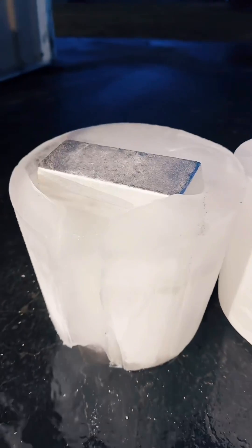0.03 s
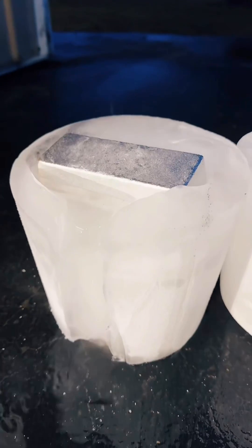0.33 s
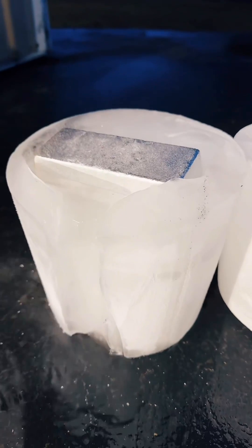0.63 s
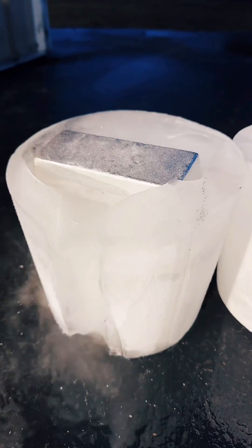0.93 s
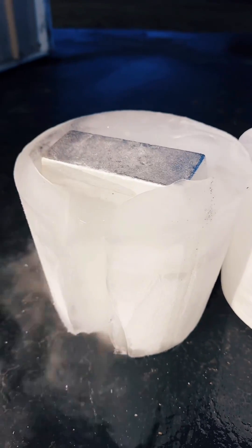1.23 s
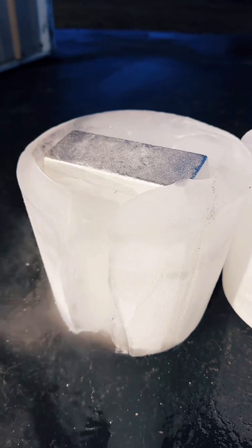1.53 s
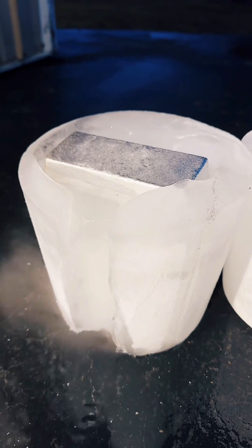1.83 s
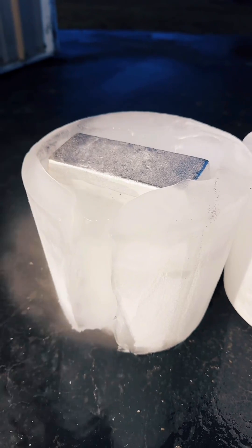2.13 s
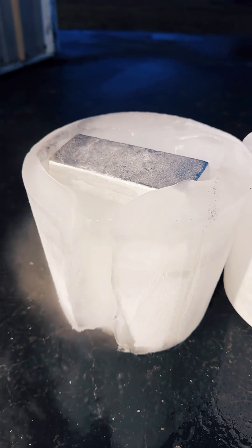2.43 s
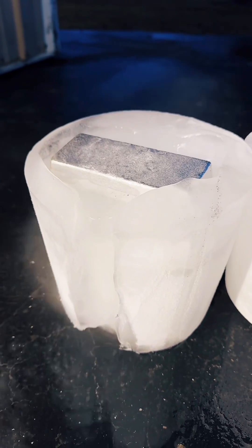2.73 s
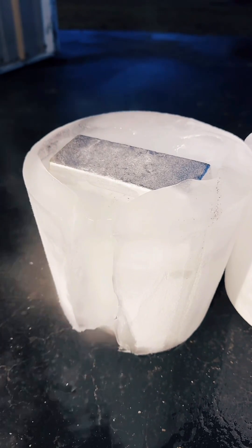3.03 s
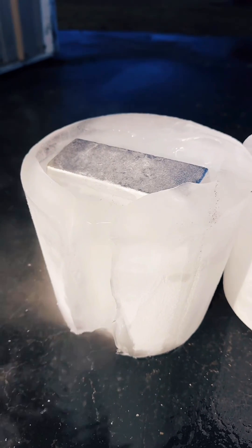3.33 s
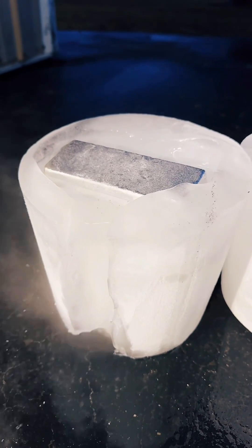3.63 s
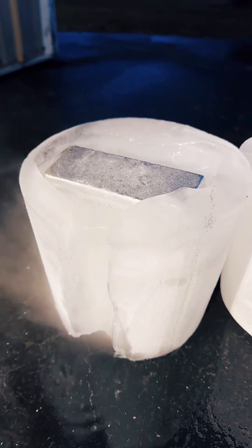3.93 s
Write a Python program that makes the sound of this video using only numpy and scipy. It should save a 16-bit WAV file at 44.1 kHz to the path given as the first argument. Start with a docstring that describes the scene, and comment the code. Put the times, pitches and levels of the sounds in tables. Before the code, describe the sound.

Close sizzling of hot metal melting into ice starts with a sharp hiss and a breathy whistle. Meltwater simmers and steam squirts slide downward in pitch, until large bubbles glug near the end, over a low air rumble.

```python
"""A hot metal bar melts its way into a block of ice on a wet surface, heard close up in mono.
It opens on a bright jet of steam and a breathy whistle from a crack, over simmering meltwater and
low air rumble. Within two seconds the jet dies down, leaving a fine sizzle with spurts of fizz.
The steam pocket under the bar rings lower and lower as it grows, and squirts whistle downwards.
Near the end big bubbles gulp out, the hollow under the block booms and a new jet opens."""
import sys
import numpy as np
from scipy import signal
from scipy.fft import rfft, irfft
from scipy.io import wavfile

SR = 44100
rng = np.random.default_rng(int(sys.argv[2]) if len(sys.argv) > 2 else 0)


def wav_record(signal):
    """Record a signal, one row per channel, as 16-bit PCM in the file named by sys.argv[1]."""
    frames = np.transpose(np.atleast_2d(signal))
    bounded = np.clip(frames, -1, 1)
    # unit amplitude maps onto the largest positive 16-bit level
    quanta = np.round(bounded * 32767).astype(np.int16)
    wavfile.write(sys.argv[1], SR, quanta)


N = 176400  # 4 s


# EQ of the opening jet: (frequency [Hz], gain [dB])
JET_EQ = [(100, -62), (1100, -28), (2000, -25), (2650, -21.5), (2950, -8), (3250, -8.5), (3500, -9),
          (3850, -10), (4450, -10.5), (4850, -15), (5150, -3), (5450, 1.5), (5850, -3.5), (6050, -6),
          (6350, -4.5), (7200, -10.5), (7800, -9.5), (8300, -15), (8750, -24), (9400, -11.5), (10800, -20),
          (11500, -14.5), (12200, -20.5), (13600, -22), (14400, -26), (16000, -25)]
# its fade-out: (time [s], level [dB])
JET_FADER = [(0, -25.5), (.19, -25), (.42, -28.5), (.6, -30.5), (.97, -28.5), (1.12, -34.5), (1.22, -33.5),
             (1.5, -42), (1.7, -42), (4, -77)]

def jet():
    """Steam rushes out from under the hot bar in a bright hiss that dies away."""
    hiss = patchy(bursts(6000, spread_db=2.3, wash=0.97), depth_db=1.5, span_hz=400, span_s=0.055)
    return colour(hiss, JET_EQ) * amp(curve(JET_FADER))


# EQ of the sizzle, peaking at the resonances of the gap under the bar: (frequency [Hz], gain [dB])
SIZZLE_EQ = [(100, -28), (700, -9.5), (1000, -14), (1400, -6), (2300, 0), (2800, -8), (3250, 0.5),
             (3550, 1.5), (3900, 5), (4200, 0), (4450, 1), (4750, -1.5), (5100, 0), (5450, 2.5),
             (5900, -0.5), (6100, -1.5), (6600, -3.5), (7100, -12), (7650, -4.5), (7900, -12), (8250, -2.5),
             (8600, -10), (9100, -14.5), (9700, -13.5), (10600, -13), (11200, -14.5), (12200, -17),
             (12700, -17), (16000, -24)]
# its nearly even level: (time [s], level [dB])
SIZZLE_FADER = [(0, -35), (.55, -34.5), (.8, -32.5), (1, -34), (1.15, -33), (1.55, -31.5), (1.67, -35.5),
                (1.9, -33), (2.1, -34), (2.25, -33.5), (2.4, -32.5), (2.8, -34.5), (2.93, -32),
                (3.05, -35.5), (3.45, -34.5), (3.68, -40.5), (4, -31)]

def sizzle():
    """The water film boils in patches against the metal."""
    film = patchy(bursts(5000, spread_db=3.3, wash=0.69), depth_db=2.0, span_hz=597, span_s=0.06)
    return colour(film, SIZZLE_EQ) * amp(curve(SIZZLE_FADER))


# airy EQ of the spray: (frequency [Hz], gain [dB])
FIZZ_EQ = [(100, -24), (2000, -10.5), (5500, -0.5), (7100, -1.5), (8100, 1.5), (9000, -7), (9800, -2),
           (12100, -4.5), (12800, -7), (16000, -10)]
# its spurts: (time [s], level [dB])
FIZZ_FADER = [(0, -30.5), (.8, -40.5), (.87, -47), (.93, -51), (1.05, -29.5), (1.16, -52), (1.45, -40.5),
              (1.58, -39), (1.67, -46), (1.75, -38.5), (2.03, -39.5), (2.08, -34.5), (2.14, -42),
              (2.65, -37.5), (2.84, -42), (2.88, -36), (2.98, -40), (3.02, -46), (3.1, -36.5), (3.27, -43),
              (3.6, -39), (4, -42)]

def fizz():
    """Fine spray spits out in fluttering spurts."""
    spray = colour(bursts(6000, spread_db=1.9, wash=0.98), FIZZ_EQ)
    return spray * amp(curve(FIZZ_FADER) + 1.5 * wander(25))


# sweep of the second jet: (time [s], resonance [Hz], level [dB])
NEW_JET_SWEEP = [(3.66, 8300, -73), (3.74, 8050, -38.5), (3.8, 7600, -36), (3.87, 7650, -42),
                 (3.93, 6440, -35), (3.98, 6030, -37), (4, 6000, -35)]

def new_jet():
    """A fresh steam jet opens at the end, a wide band of hiss sweeping down."""
    hiss = resonate(rng.standard_normal(N), curve(NEW_JET_SWEEP), width_hz=2000)
    return hiss * amp(curve(NEW_JET_SWEEP, axis=2))


def steam():
    """Jets, sizzle and spray reflect inside the hollow of the ice and sputter together."""
    bus = jet() + sizzle() + fizz() + new_jet()
    ring_s, wet = 0.0076, 0.35
    t = np.arange(2048) / SR
    tail = rng.standard_normal(len(t)) * np.exp(-t / ring_s)
    reflections = signal.fftconvolve(bus, tail / np.linalg.norm(tail))[:N]
    return (bus + wet * reflections) * amp(0.6 * wander(20))


# sweep of the steam pocket: (time [s], lower resonance [Hz], level [dB])
POCKET_SWEEP = [(0, 2330, -63), (1.1, 2280, -45), (1.38, 2130, -38.5), (1.52, 2000, -41), (1.63, 1930, -38),
                (1.71, 1930, -38), (2.0, 1920, -36), (2.3, 2010, -40), (2.62, 1930, -40),
                (2.72, 1840, -34.5), (2.95, 1930, -33), (3.2, 1760, -31.5), (3.32, 1760, -33.5),
                (3.45, 1510, -35), (3.58, 1450, -35), (3.62, 1690, -40.5), (3.68, 1800, -34),
                (3.8, 1720, -42.5), (3.93, 2000, -37), (4, 1850, -40)]

def pocket():
    """Steam rings two resonances of the pocket under the bar, which sink as it grows."""
    hz = curve(POCKET_SWEEP) + 35 * wander(13)
    lower = resonate(bursts(2500, spread_db=3.2, wash=0.68), hz, width_hz=580)
    upper = resonate(bursts(2300, spread_db=4.2, wash=0.63), hz * 1.32, width_hz=710)
    low_cut = signal.butter(4, 1100, "high", fs=SR, output="sos")
    ring = signal.sosfilt(low_cut, lower + amp(-6) * upper)
    return ring * amp(curve(POCKET_SWEEP, axis=2) + 0.79 * wander(50))


# steam squirts: (time [s], length [s], start pitch [Hz], end pitch [Hz], level [dB])
SQUIRT_CUES = [(1.384, 0.13, 2230, 1990, -39), (1.57, 0.12, 1980, 1810, -33),
               (3.126, 0.16, 1880, 1370, -34.5), (3.269, 0.12, 2120, 1510, -33),
               (3.629, 0.05, 2050, 1910, -36.5)]

def squirts():
    """Short squirts of steam swell and fade as they whistle downwards."""
    out = np.zeros(N)
    for s, length, start_hz, end_hz, db in SQUIRT_CUES:
        glide = np.linspace(start_hz, end_hz, round(length * SR))
        squirt = resonate(rng.standard_normal(N)[:len(glide)], glide, width_hz=280)
        add(out, s, amp(db) * np.hanning(len(glide)) * squirt)
    return out


# main whistle of the crack: (time [s], level [dB])
WHISTLE_FADER = [(0, -33.5), (.45, -42), (.95, -34), (1.12, -46.5), (1.7, -44), (1.94, -34.5), (2.22, -47),
                 (2.35, -38), (2.6, -45), (2.68, -32), (3.02, -41.5), (3.7, -36.5), (4, -45)]
# upper whistle, swelling as the crack widens: (time [s], level [dB])
UPPER_FADER = [(0, -55), (2.6, -57), (3.2, -48), (3.4, -44), (4, -43)]
# thin hiss on top: (time [s], level [dB])
TOP_FADER = [(0, -60), (1.6, -53), (2.0, -49.5), (2.5, -47.5), (2.65, -43), (2.8, -50.5), (3.4, -46.5),
             (4, -45.5)]

def whistles():
    """Steam whistles breathily through a narrow crack, at three pitches."""
    sag_hz_per_s = 24
    pitch = 3860 - sag_hz_per_s * np.arange(N) / SR + 35 * wander(7.3)
    main = resonate(bursts(3000, spread_db=1.9, wash=1.0), pitch, width_hz=290)
    upper = resonate(rng.standard_normal(N), hz=np.full(N, 4755), width_hz=290)
    top = resonate(rng.standard_normal(N), hz=np.full(N, 9970), width_hz=600)
    return main * amp(curve(WHISTLE_FADER)) + upper * amp(curve(UPPER_FADER)) + top * amp(curve(TOP_FADER))


# big bubbles: (time [s], start pitch [Hz], ring level [dB], splash level [dB])
GULP_CUES = [(.38, 370, -23, -54), (.68, 380, -46, -37.5), (.727, 187, -27.5, -52), (1.257, 352, -22, -32),
             (2.397, 446, -35, -36), (3.454, 366, -12, -22), (3.468, 461, -11.5, -23.5),
             (3.501, 305, -25, -29), (3.668, 374, -19.5, -30.5), (3.869, 330, -27, -28),
             (3.876, 466, -15, -23.5), (3.899, 295, -24, -28.5), (3.911, 344, -33, -38)]
# EQ of a splash: (frequency [Hz], gain [dB])
SPLASH_EQ = [(50, -50), (150, -34), (230, 4.5), (500, -4), (700, -1), (950, -14), (1800, -8.5), (3000, -23),
             (6000, -28), (16000, -34)]
# modes of the ice walls: (frequency [Hz], level against the splash [dB], decay [s])
WALL_MODES = [(374, -7, 0.03), (486, -2, 0.0097), (653.6, -10, 0.019), (948, -9.5, 0.018),
              (1404, -25, .025)]

def gulps():
    """Each big bubble rings briefly, rising in pitch; its splash rings the ice walls."""
    attack_s, ring_s, splash_s, glide_per_s = 0.0025, 0.0086, 0.026, 2.72
    t = np.arange(SR // 5) / SR
    attack = np.minimum(t / attack_s, 1)
    out = np.zeros(N)
    for s, hz, ring_db, splash_db in GULP_CUES:
        ring = np.sin(2 * np.pi * hz * (t + glide_per_s * t ** 2 / 2)) * np.exp(-t / ring_s)
        splash = colour(rng.standard_normal(len(t)), SPLASH_EQ) * np.exp(-t / splash_s)
        walls = sum(amp(db) * np.sin(2 * np.pi * (f * t + rng.random())) * np.exp(-t / decay)
                    for f, db, decay in WALL_MODES)
        add(out, s, attack * (amp(ring_db) * ring + amp(splash_db) * (splash + walls)))
    return out


# booms of the hollow: (time [s], start pitch [Hz], level [dB])
BOOM_CUES = [(3.461, 278, -19), (3.668, 205, -27), (3.85, 162, -26), (3.893, 142.6, -22.5)]

def booms():
    """The hollow under the block booms lower as it grows, each note sagging in pitch."""
    attack_s, ring_s, sag_per_s = 0.008, 0.028, 6.4
    t = np.arange(SR // 4) / SR
    envelope = np.minimum(t / attack_s, 1) * np.exp(-t / ring_s)
    out = np.zeros(N)
    for s, hz, db in BOOM_CUES:
        add(out, s, amp(db) * envelope * np.sin(2 * np.pi * hz * (t - sag_per_s * t ** 2 / 2)))
    return out


# dark EQ of the meltwater: (frequency [Hz], gain [dB])
SIMMER_EQ = [(40, -47), (150, -14.5), (245, -14), (300, -4), (385, 0), (480, -2), (600, -10.5), (850, -27),
             (1500, -36), (5000, -70)]
# its slow build: (time [s], level [dB])
SIMMER_FADER = [(0, -46), (.5, -43.5), (.7, -37.5), (1.05, -44), (1.25, -41), (1.7, -40), (2.1, -36),
                (2.6, -38), (3.2, -38), (3.8, -33.5), (4, -34)]
# main ring of the small bubbles, rising at first: (time [s], pitch [Hz], level [dB])
BUBBLE_SWEEP = [(0, 324, -44), (.7, 335, -43), (1.3, 364, -40.5), (2.1, 400, -39.5), (3.2, 397, -40),
                (4, 380, -44.5)]

def simmer():
    """Small bubbles burst in the meltwater, a soft bed under the steam."""
    bed = colour(bursts(500, spread_db=1.86, wash=0.73), SIMMER_EQ)
    ring = resonate(bursts(500, spread_db=1.9, wash=0.6), curve(BUBBLE_SWEEP), width_hz=142)
    return bed * amp(curve(SIMMER_FADER)) + ring * amp(curve(BUBBLE_SWEEP, axis=2))


# bass-heavy EQ of the air: (frequency [Hz], gain [dB])
RUMBLE_EQ = [(15, -42), (30, -32), (45, -9), (63, 3), (95, -2), (150, -4), (250, -21), (600, -14),
             (3000, -82)]
# its swells: (time [s], level [dB])
RUMBLE_FADER = [(0, -60), (.1, -47), (.55, -50), (.75, -40.5), (1.05, -50.5), (1.3, -47), (2.2, -51),
                (3.3, -48), (4, -44.5)]
# soft thumps: (time [s], pitch [Hz], level [dB])
THUMP_CUES = [(.08, 75, -33), (.208, 70, -24.5), (0.366, 114, -34.5), (0.424, 75, -31), (1.735, 100, -35)]

def rumble():
    """Air on the microphone makes a low rumble, with a few soft thumps."""
    out = colour(rng.standard_normal(N), RUMBLE_EQ) * amp(curve(RUMBLE_FADER))
    thump_s = 0.048
    t = np.arange(0, thump_s, 1 / SR)
    envelope = np.sin(np.pi * t / thump_s) ** 2
    for s, hz, db in THUMP_CUES:
        add(out, s, amp(db) * envelope * np.sin(2 * np.pi * hz * t))
    return out


def bursts(per_s, spread_db, wash):
    """Tiny bursting bubbles of uneven size over a wash of turbulence, at rms 1."""
    size = amp(spread_db * np.minimum(rng.exponential(1, N), 4))
    clicks = size * rng.choice([-1, 1], N) * (rng.random(N) < per_s / SR)
    return unit(unit(clicks) + wash * rng.standard_normal(N))


def patchy(x, depth_db, span_hz, span_s):
    """Separate spots boil up and fade: random patches of gain in time and frequency."""
    frame, hop = 512, 128
    spectra = signal.stft(x, nperseg=frame, noverlap=frame - hop)[2]
    across = np.fft.fftfreq(spectra.shape[0], SR / frame)[:, None] * span_hz
    along = np.fft.fftfreq(spectra.shape[1], hop / SR) * span_s
    blur = np.exp(-across ** 2 - along ** 2)
    patches = np.fft.ifft2(np.fft.fft2(rng.standard_normal(spectra.shape)) * blur).real
    return signal.istft(spectra * amp(depth_db * unit(patches)), nperseg=frame, noverlap=frame - hop)[1][:N]


def resonate(x, hz, width_hz):
    """A steep band-pass that follows a pitch curve, at rms 1."""
    carrier = np.exp(2j * np.pi * np.cumsum(hz) / SR)
    pole = np.exp(-np.pi * width_hz / SR)
    return unit((carrier * signal.lfilter([1], np.poly([pole, pole]), x / carrier)).real)


def colour(x, eq):
    """Plays x through an EQ curve, at rms 1."""
    hz, db = np.transpose(eq)
    f = np.fft.rfftfreq(len(x), 1 / SR)
    gain = amp(np.interp(np.log(f + 1), np.log(hz), db))
    return unit(irfft(rfft(x) * gain, len(x)))


def wander(rate_hz):
    """Smooth random modulation from 2 Hz up to about rate_hz, at rms 1."""
    f = np.fft.rfftfreq(N, 1 / SR)
    band = np.exp(-(f / rate_hz) ** 2) * (f > 2)
    return unit(irfft(rfft(rng.standard_normal(N)) * band, N))


def curve(rows, axis=1):
    """An automation lane: one column of a time table, joined by straight lines."""
    rows = np.array(rows)
    return np.interp(np.arange(N) / SR, rows[:, 0], rows[:, axis])


def add(mix, s, sound):
    """Drops a sound into the mix at s seconds."""
    part = mix[round(s * SR):][:len(sound)]
    part += sound[:len(part)]


def amp(db):
    return 10 ** (np.asarray(db) / 20)


def unit(x):
    """Scales to rms 1."""
    return x / np.sqrt(np.mean(x ** 2) + 1e-20)


def scene():
    """Steam, water and air, mixed dead centre."""
    mono = steam() + pocket() + squirts() + whistles() + simmer() + gulps() + booms() + rumble()
    return np.array([mono, mono])


def record(dry):
    """A steep high cut at 15850 Hz on the whole mix."""
    high_cut = signal.firwin(701, 15850, window=("kaiser", 9), fs=SR)
    return signal.oaconvolve(dry, high_cut[None], "same")


dry = scene()
out = record(dry)
wav_record(out)
```